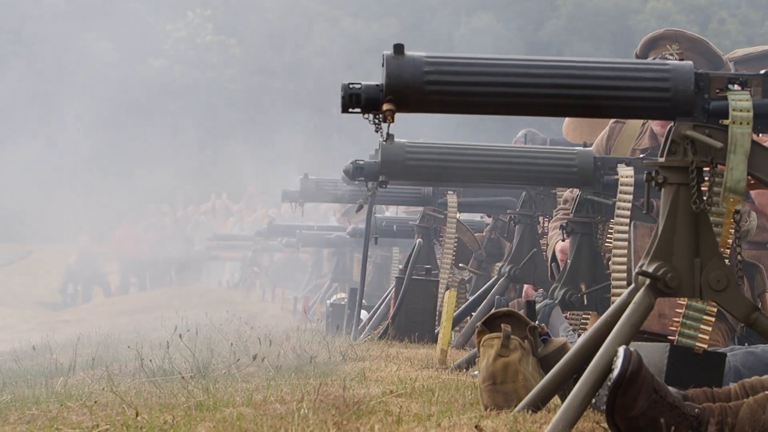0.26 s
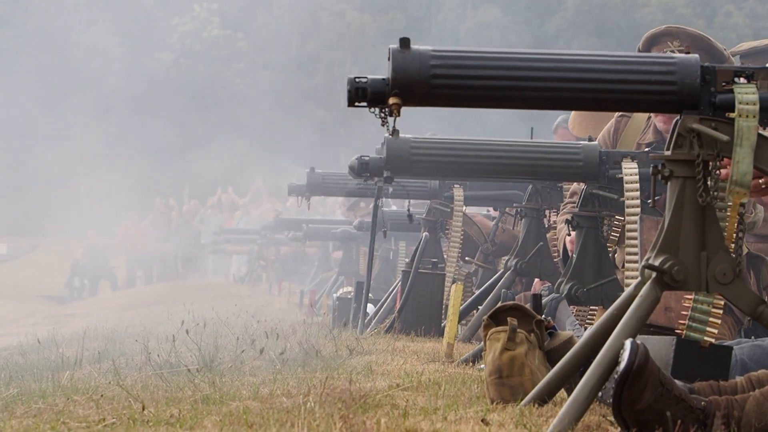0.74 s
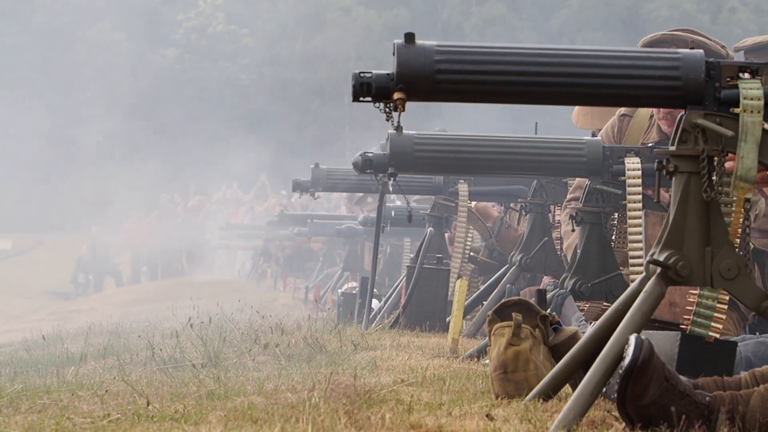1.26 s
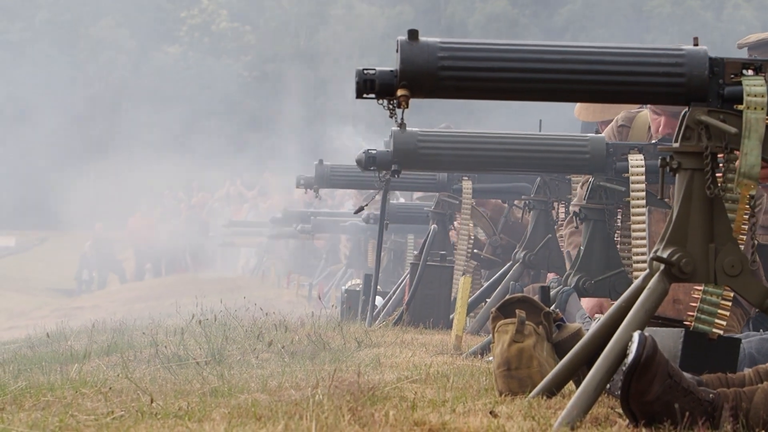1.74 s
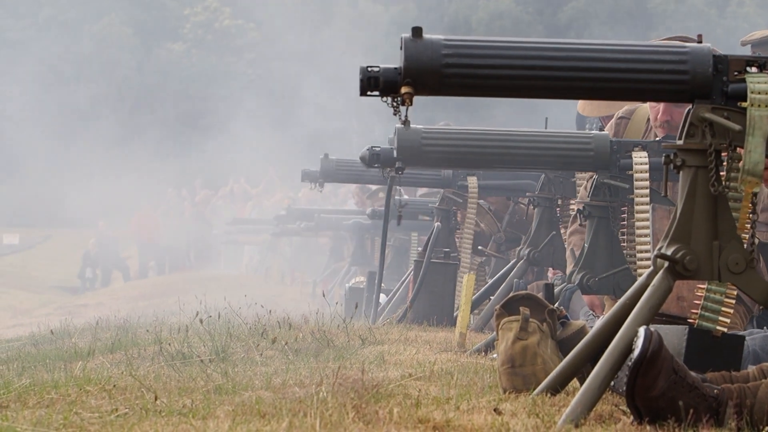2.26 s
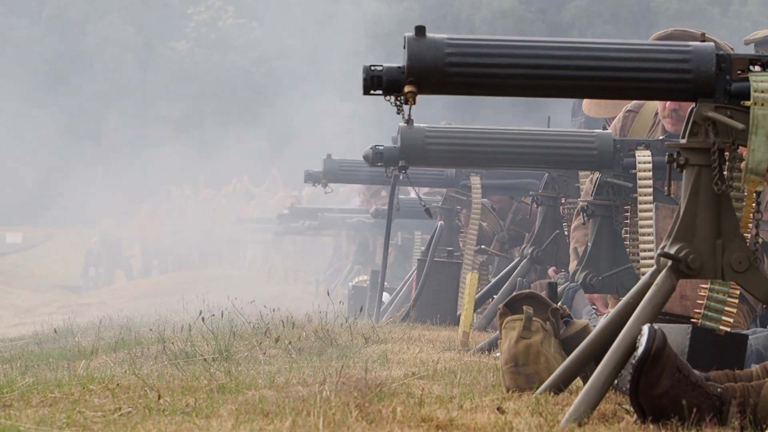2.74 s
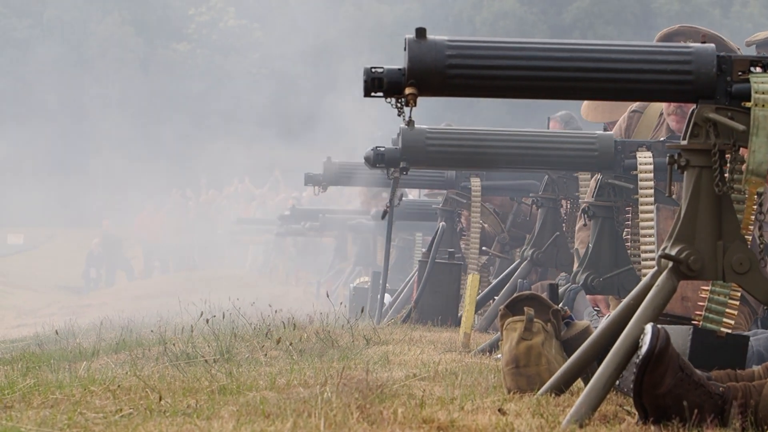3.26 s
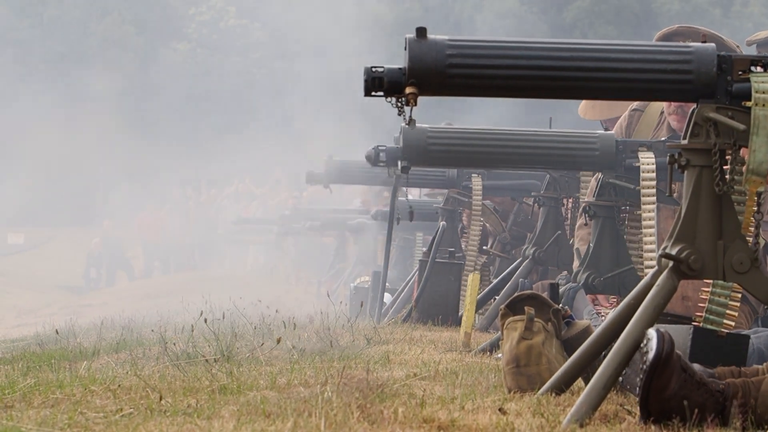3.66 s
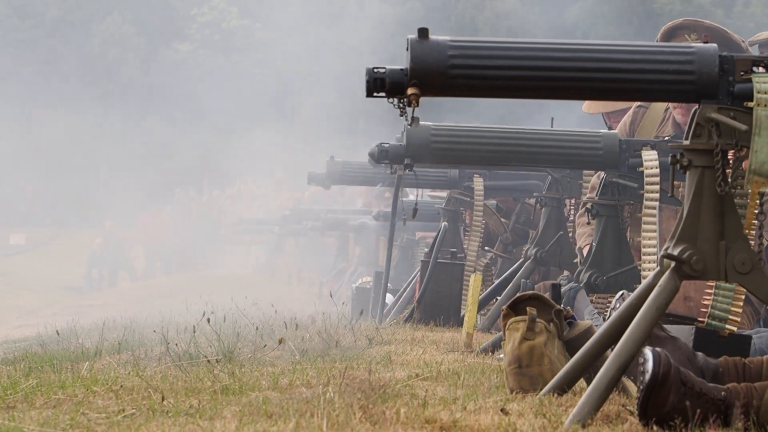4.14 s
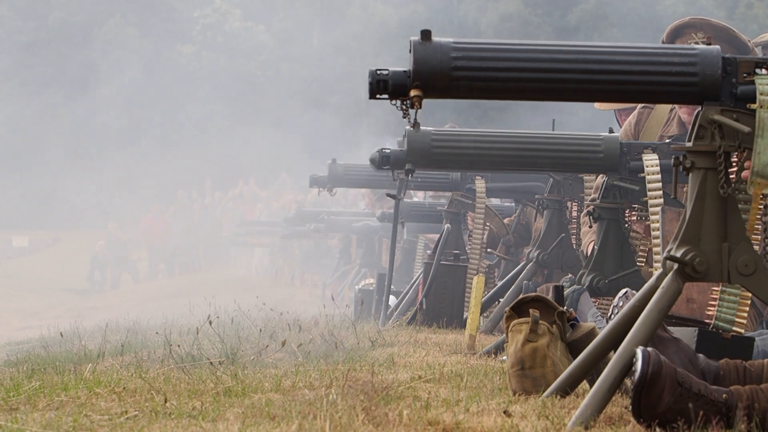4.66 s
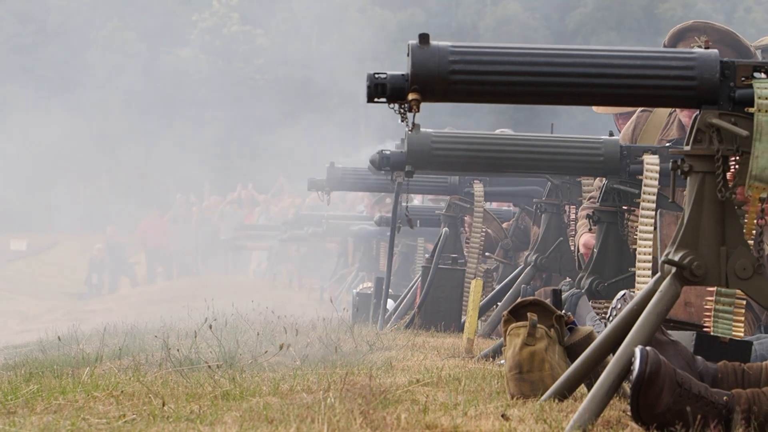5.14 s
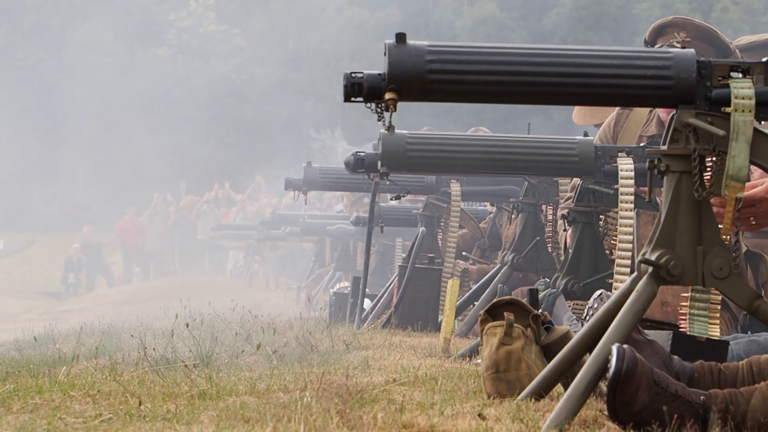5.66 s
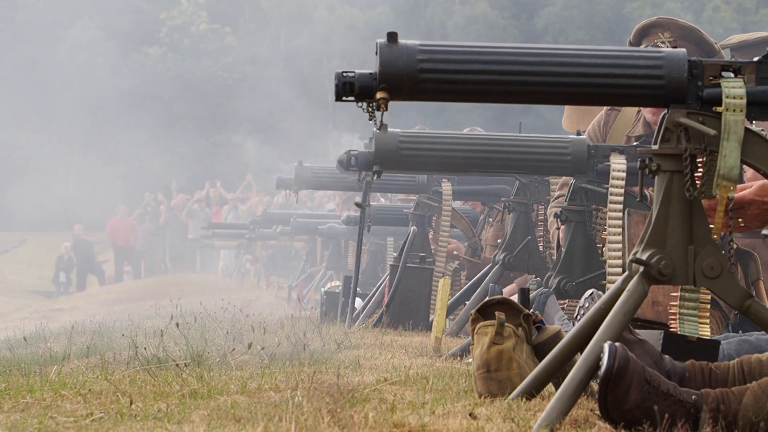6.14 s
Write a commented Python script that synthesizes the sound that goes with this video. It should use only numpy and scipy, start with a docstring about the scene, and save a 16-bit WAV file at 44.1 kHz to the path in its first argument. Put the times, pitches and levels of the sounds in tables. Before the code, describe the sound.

Close stereo pickup of a machine-gun line outdoors. Strong even bangs come first with weaker shots between them, then a stuttering, lighter crossfire scattered left and right, and finally about seven heavy shots per second dominate. Each shot is a clipped snap with a tinny metal ring, a short thump and a quick spray of slaps from the ground, over a faint low roll and thin hiss of echoes.

```python
"""An open field where a row of water-cooled machine guns fires blanks, heard from beside the nearest gun.
Each near shot is a shock front with mirrored copies, a crack scattered off guns and tripods, ringing metal,
a low thump of muzzle gas and a spray of ground echoes. The strongest shots also ignite their gas.
Some guns keep an even pace, others stutter. Distant guns only thud, and filtered noise makes the echoes
of all the firing merge into a roll and a thin wash. The strong fronts overload the microphone and clip flat."""
import sys
import numpy as np
from scipy import signal
from scipy.fft import rfft, irfft, next_fast_len
from scipy.io import wavfile
from scipy.ndimage import uniform_filter1d

SR = 44100
rng = np.random.default_rng(int(sys.argv[2]) if len(sys.argv) > 2 else 0)


def master_out(mix):
    """Clip the mix to full scale and print it as 16-bit PCM to the path in sys.argv[1]."""
    frames = np.transpose(np.atleast_2d(mix))
    ceiling = np.clip(frames, -1, 1)
    pcm = np.round(ceiling * 32767).astype(np.int16)
    wavfile.write(sys.argv[1], SR, pcm)


N = 282673  # length of the scene in samples

# tone colour of everything the ground and field send back: (frequency [Hz], relative level [dB])
ECHO_COLOUR = [(40, -8), (170, 4), (280, -1), (470, -15), (750, -9.5), (1120, -9), (1700, -11.5),
               (3000, -13), (5000, -21), (6500, -27.5), (7500, -23.5), (11500, -33.5), (15000, -35)]


def undb(db):
    """Turn decibels into a gain."""
    return 10 ** (np.asarray(db) / 20)


def unit(x, t0, t1):
    """Scale each sound (.., channels, samples) to an average strength (rms) of 1 between two times in s."""
    part = x[..., int(t0 * SR):int(t1 * SR)]
    return x / np.sqrt(np.mean(part ** 2, axis=(-2, -1), keepdims=True))


def sized(sounds, db):
    """Apply to each sound its own level change."""
    return sounds * undb(db)[:, None, None]


def colour(x, points):
    """Filter a sound to the given (Hz, dB) outline, without smearing it ahead of its start."""
    hz, db = np.transpose(points)
    size = 2048
    grid = np.maximum(np.fft.rfftfreq(size, 1 / SR), 1)
    outline = undb(np.interp(np.log(grid), np.log(hz), db))
    # folding the cepstrum forward in time makes the filter respond only after the sound (minimum phase)
    cepstrum = irfft(np.log(outline))
    cepstrum[1:size // 2] *= 2
    cepstrum[size // 2 + 1:] = 0
    response = irfft(np.exp(rfft(cepstrum))).reshape((1,) * (x.ndim - 1) + (-1,))
    return signal.fftconvolve(x, response, axes=-1)[..., :x.shape[-1]]


def stereo_noise(count, size, width, split_hz, bass_width=0.044):
    """Noises (count, 2, size), nearly alike on both sides in the bass and more different above split_hz."""
    mid, side = rng.standard_normal((count, 2, size)).transpose(1, 0, 2)
    treble = signal.sosfilt(signal.butter(1, split_hz, "high", fs=SR, output="sos"), side)
    side = bass_width * side + width * treble
    return np.stack([mid + side, mid - side], axis=1)


def place(times, sounds):
    """Add stereo sounds to a silent time line at their start times."""
    out = np.zeros((2, N))
    for s, sound in zip(times, sounds):
        i = int(np.clip(s * SR, 0, N - 1))
        out[:, i:i + sound.shape[-1]] += sound[:, :N - i]
    return out


def hollows(x):
    """Hollow gear round the guns hums at its own pitches when a sound excites it."""
    # resonances: (frequency [Hz], width [Hz], level against the exciting sound [dB])
    gear = [(178.4, 23, -3), (1037, 60, -6), (1357, 85, 2)]
    hum = 0
    for hz, width, db in gear:
        b, a = signal.iirpeak(hz, hz / width, fs=SR)
        hum = hum + undb(db) * signal.lfilter(b, a, x)
    return hum


def field(roll_db=-2, wash_db=-4, split_hz=450, hum_db=1):
    """The merged echoes of all the firing: coloured noise as a low roll and a thin wash, humming in the gear."""
    # how loud the roll and the wash are over time, dipping now and then, before the two overall level changes
    # roll_db and wash_db: (time [s], roll level [dB], wash level [dB])
    rumble = [(0.0, -35.5, -38.5), (1.05, -53, -44), (1.73, -48, -47.5), (3.77, -48, -53), (4.55, -55, -50),
              (5.03, -50, -49), (5.12, -57.5, -49), (6.41, -50, -46)]
    s, low, high = np.transpose(rumble)
    t = np.arange(N) / SR
    echoes = colour(stereo_noise(count=1, size=N, width=1.0, split_hz=2400), ECHO_COLOUR)[0]
    echoes = echoes + undb(hum_db) * hollows(echoes)
    roll = signal.sosfilt(signal.butter(4, split_hz, "low", fs=SR, output="sos"), echoes)
    wash = signal.sosfilt(signal.butter(4, split_hz, "high", fs=SR, output="sos"), echoes)
    roll_gain = undb(np.interp(t, s, low) + roll_db)
    wash_gain = undb(np.interp(t, s, high) + wash_db)
    return roll / roll.std() * roll_gain + wash / wash.std() * wash_gain


def thumps(t, db, thump_hz=104, fade_s=0.0021, scatter=0.29, usual_db=-25, longer_per_db=.022,
           churn=0.15, churn_hz=260):
    """The ball of muzzle gas swells, churns and settles within about a cycle; a bigger ball takes longer."""
    life_s = fade_s * np.exp((db[:, None, None] - usual_db) * longer_per_db)
    # each ball runs through its motion a little faster or slower
    age = t / np.exp(scatter * rng.standard_normal((len(db), 1, 1)))
    noise = rng.standard_normal((len(db), 2, len(t)))
    eddies = signal.sosfilt(signal.butter(2, churn_hz, fs=SR, output="sos"), noise)
    swing = np.sin(2 * np.pi * thump_hz * age) + churn * eddies / eddies.std() * age / life_s
    return sized(unit(swing * np.exp(-age / life_s), 0, .01), db)


def far_guns(scatter_db=3, turf_hz=190):
    """Distant guns keep their own nearly even pace; the turf swallows all but a thud."""
    # guns far down the line, before the low-pass of the turf: (firing rate [shots/s], thump level [dB])
    distant = [(7.1, -37), (7.6, -36.5)]
    t = np.arange(int(.05 * SR)) / SR
    out = 0
    for rate, db in distant:
        s = (np.cumsum(rng.normal(1, 0.03755, size=60)) - rng.uniform(0, 1)) / rate
        levels = db + scatter_db * rng.standard_normal(len(s))
        out = out + place(s[s < N / SR], thumps(t, levels))
    return signal.sosfilt(signal.butter(4, turf_hz, fs=SR, output="sos"), out)


def rounds():
    """All near shots as rows (s, front dB, thump dB, left minus right dB): single ones, then even bursts."""
    # levels here are starting values that near_guns adjusts further
    # single shots with their own time and level, some from guns that also fire even bursts:
    # (time [s], shock front level [dB], gas thump level [dB], left minus right [dB])
    single_shots = [(.1243, 4.5, -20, 0.5), (0.1613, -11, -25, -2), (.2119, -24, -33, -1),
                    (0.2756, 3.5, -19, 1), (.311, -13.5, -26, -1), (0.4154, 2.5, -20.5, 2),
                    (0.4524, -14, -26.5, 2), (.557, 2.5, -21, -3.5), (0.6037, -12.5, -24.5, 2),
                    (.6985, 1.5, -24.5, 4), (0.7607, -15, -29.5, 3), (.8419, 1.5, -18.5, -2.5),
                    (.8889, -2, -16.5, -8), (.972, -15.5, -27, 0), (1.0222, -11.5, -23, -2),
                    (1.04, -2, -22, 2), (1.197, -1.5, -24.5, 1), (1.331, -20, -28, 1),
                    (1.3487, -2, -21.5, 1), (1.4917, -5.5, -22, 2), (1.5092, -4.5, -24.5, 1),
                    (1.6402, -6.5, -24.5, -1), (1.654, -4, -50, 3), (1.81, -5, -38, 0),
                    (1.9765, -5, -35, 9), (2.1337, -10, -43, 10), (2.2779, -12, -29.5, 7),
                    (2.427, -9.5, -32, 8.5), (2.4661, -4.5, -31.5, -3), (2.575, -6, -36, 0),
                    (2.7284, -11, -28, 2), (2.8797, -10.5, -32, 8), (3.0451, -6.5, -32, 2),
                    (3.1913, -6.5, -42, 2), (3.3533, -10.5, -30.5, 7), (3.402, -4, -30.5, -3),
                    (3.502, -7.5, -29.5, 9), (3.5514, -6, -31, 9), (3.6519, -7, -28.5, 7.5),
                    (3.7002, -3, -26, 0), (3.822, -12, -24, 1), (3.8501, -2.5, -28, 2.5),
                    (3.979, -9.5, -21, 2), (3.9978, -2, -46, 6), (4.1248, -11, -22.5, -5),
                    (4.1437, -1.5, -32, 0), (4.2758, -7.5, -26.5, 2), (4.2812, -5, -27.5, -3),
                    (4.2907, -4, -39, 11), (4.4317, -2.5, -23.5, 7), (4.5774, 1, -18, -7),
                    (4.7013, -6, -24.5, -0.5), (4.7262, -0.5, -43, -4.5), (4.8752, -1, -21.5, 6),
                    (4.9447, -8, -21, 0), (5.022, -1, -28.5, 2.5), (5.068, -17, -32.5, -3),
                    (5.1616, -0.5, -23.5, 1), (5.3048, 0, -21.5, -8.5), (5.428, -5.5, -17, -1),
                    (5.4455, -1, -25, -7), (5.5826, -7.5, -18.5, 1), (5.5912, 0.5, -22, -6),
                    (5.731, 1.5, -20.5, -2.5), (5.883, 1.5, -22.5, -1), (6.0248, 2, -21, -2),
                    (6.1689, 2, -21.5, 2), (6.3092, 2.5, -22, -3), (6.3857, -19, -33.5, 0)]
    # stretches of fire at an even pace: (first shot [s], last shot [s], rounds [count],
    # shock front level [dB], gas thump level [dB], left minus right [dB])
    bursts = [(0.529, 0.943, 4, -21, -33.5, 0), (1.142, 1.266, 2, -17, -30, 1.5),
              (1.5561, 1.8, 3, -6.5, -29.5, -0.5), (1.8614, 2.3443, 5, -3, -30.5, -5),
              (1.9233, 3.2671, 12, -12.5, -31.5, -0.5), (2.5924, 2.8335, 3, -3.5, -31, 1),
              (2.9555, 3.3216, 4, -1.95, -31, 0), (3.3846, 3.624, 3, -17, -32, 1),
              (3.4412, 3.802, 4, -8.5, -30.5, 0), (3.9205, 4.1594, 3, -11, -29.5, 0.5),
              (4.1011, 4.824, 7, -18, -30, -1)]
    # no two rounds of a burst are quite alike; random spread: (front [dB], thump [dB], left minus right [dB])
    round_spread = (0.5, 2, 4)
    rows = [np.array(single_shots)]
    for first, last, number, *levels in bursts:
        s = np.linspace(first, last, int(round(number)))
        varied = levels + rng.standard_normal((len(s), 3)) * round_spread
        rows.append(np.column_stack([s, varied]))
    return np.vstack(rows)


def shock_front(t, rise_s=.000014, fall_s=.00008):
    """A steep pressure spike with a shallow swing back; the tallest of the set has peak 1."""
    pulse = -(1 - np.exp(-t / rise_s)) * (1 - t / fall_s / 2) * np.exp(-t / fall_s)
    return pulse / np.abs(pulse).max()


def mirrored_fronts(t, count, wander=0.071, scatter_db=9.0):
    """Hard surfaces close by send copies of the front about 2 ms later or less, unequal on the two sides."""
    # usual copies, varied at random for each shot: (delay [s], relative level [dB])
    mirrors = [(.00043, -14.5), (.00097, -3), (.0019, -10.5)]
    out = 0
    for delay, db in mirrors:
        late = delay * np.exp(wander * rng.standard_normal((count, 1, 1)))
        gain = undb(db + scatter_db * rng.standard_normal((count, 2, 1)))
        out = out + gain * shock_front(np.maximum(t - late, 0))
    return out


def ring(t, count, detune=0.017):
    """Struck metal rings in fading tones; every blow lands a little differently."""
    # muzzle fittings, water jackets and ammunition boxes, before the random force and pitch of each blow:
    # (frequency [Hz], time to fade by 60 dB [s], level within the crack [dB])
    metal = [(175, 0.32, -44.5), (1034, 0.077, -19.5), (2220, 0.025, -18.5), (2610, 0.0042, 3),
             (3110, 0.0095, -6.5), (7370, 0.019, -6.5)]
    out = 0
    for hz, t60, db in metal:
        force, pitch = rng.standard_normal((2, count, 1, 1))
        fade = undb(db + 2 * force - 60 * t / t60)
        out = out - fade * np.sin(2 * np.pi * hz * (1 + detune * pitch) * t)
    return out


def cracks(t, count, fast_s=0.0014, slow_s=0.0031, slow_db=-14, bounce_db=-3):
    """The front bounces among barrels and tripods for a few ms and sets the metal ringing."""
    # tone colour of the bounces: (frequency [Hz], relative level [dB])
    crack_outline = [(120, -8), (320, -4.5), (480, -15), (660, -2), (1000, -11.5), (1500, -16.5), (2230, 1),
                     (2650, -2.5), (3100, -0.5), (3900, -7.5), (5100, -9.5), (6600, -17), (7400, -9),
                     (8600, -18), (15000, -23)]
    fade = np.exp(-t / fast_s) + undb(slow_db) * np.exp(-t / slow_s)
    bounces = stereo_noise(count, size=len(t), width=0.46, split_hz=1200) * fade
    # a first blow, the same for every shot, outweighs the later bounces
    bounces[..., 0] -= 6.5
    return undb(bounce_db) * unit(colour(bounces, crack_outline), .0003, .005) + ring(t, count)


def flashes(t, count, delay_s=0.0059, length_s=0.0026, scatter=0.071):
    """Muzzle gas that catches fire pushes out a second, rounded pressure wave a few ms after the front."""
    delay, length = np.exp(scatter * rng.standard_normal((2, count, 1, 1)))
    return -np.exp(-((t - delay_s * delay) / (length_s * length)) ** 2)


def ground_echoes(t, count, arrive_s=0.0099, fade_s=0.019, late_db=-18, late_s=0.02, patchy_db=3, grain_db=6):
    """The blast scatters back as clumps of small slaps from the turf, the crews and the rest of the row."""
    swell = 1 - np.exp(-(t / arrive_s) ** 4)
    fade = np.exp(-t / fade_s) + undb(late_db) * np.exp(-t / late_s)
    grain = rng.standard_normal((count, 1, len(t)))
    clumps = uniform_filter1d(grain, size=130)
    unevenness = undb(patchy_db * clumps / clumps.std() + grain_db * grain)
    slaps = stereo_noise(count, size=len(t), width=0.54, split_hz=820) * unevenness
    spray = colour(slaps * swell * fade, ECHO_COLOUR)
    return unit(spray + hollows(spray), .009, .035)


def bank_echoes(t, count, delay_s=0.058, spread_s=0.0058, bank_hz=175):
    """A dull, smeared return from some ten metres away: a short swell of low tone, its pitch varied."""
    chance = rng.standard_normal((count, 2, 1, 1))
    hz = bank_hz * np.exp(0.128 * chance[:, 0])
    return np.sin(2 * np.pi * (hz * t + chance[:, 1])) * np.exp(-((t - delay_s) / spread_s) ** 2)


def near_guns(front_db=2.0, mirror_db=17, echo_db=4, bank_db=1):
    """Every shot of the nearest guns; its front and thump set the crack, the muzzle flash and the echoes."""
    s, front, thump, pan = rounds().T
    count = len(s)
    t = np.arange(int(.09 * SR)) / SR
    t_long = np.arange(int(.2 * SR)) / SR

    # the gas of the strongest shots ignites: half burns at a front of -0.65 dB, with a soft threshold
    burnt = (1 + np.tanh((front + 0.65) / 0.5)) / 2
    # the crack grows faster than the front that causes it, and a full flash adds 3 dB
    crack = -15.5 + 1.485 * front + 3 * burnt
    # the echoes follow mostly the thump (against a usual -21 dB) and a little the front
    echo = -32.5 + 1.41 * (thump + 21) + 0.38 * front

    # a weak front is shorter, hence brighter: 0.64 dB of length per dB of front
    spikes = shock_front(t / undb(0.64 * front)[:, None, None])
    # the mirror images fade with the crack; their common level is held to that of the front
    mirrored = sized(mirrored_fronts(t, count), np.minimum(front, crack + mirror_db) + front_db)
    sharp = sized(spikes, front + front_db) + mirrored + sized(cracks(t, count), crack)
    # burning gas adds its own whoomp (7.5 dB against the thump) and weakens the thump by up to 8 dB
    whoomp = sized(flashes(t, count), thump + 7.5) * burnt[:, None, None]
    dull = thumps(t, thump - 8 * burnt) + whoomp

    sides = undb(np.stack([pan, -pan], axis=1) / 2)[..., None]
    # long waves bend round the microphone's housing, so they lean only half as much
    direct = sharp * sides + dull * np.sqrt(sides)
    ground = sized(ground_echoes(t_long, count), echo + echo_db)
    bank = sized(bank_echoes(t_long, count), echo + bank_db)
    return place(s, direct) + place(s, ground + bank)


def scene(lean_db=1.3, lag_s=.000021):
    """The row stands slightly to the right, so its sound reaches the left side a moment later and softer."""
    left, right = near_guns() + far_guns() + field()
    # turning the phase of each frequency delays the left side by less than one sample
    size = next_fast_len(N + 64)
    delay = np.exp(-2j * np.pi * np.fft.rfftfreq(size, 1 / SR) * lag_s)
    left = irfft(rfft(left, size) * delay, size)[:N]
    return np.array([left * undb(-lean_db / 2), right * undb(lean_db / 2)])


def record(dry, bass_hz=18, top_hz=16000):
    """The microphone cuts the deepest bass, clips strong fronts flat and then cuts the top."""
    trimmed = signal.sosfilt(signal.butter(1, bass_hz, "high", fs=SR, output="sos"), dry)
    clipped = np.clip(trimmed, -1, 1)
    return signal.sosfilt(signal.ellip(8, .2, 70, top_hz, fs=SR, output="sos"), clipped)


dry = scene()
out = record(dry)
master_out(out)
```